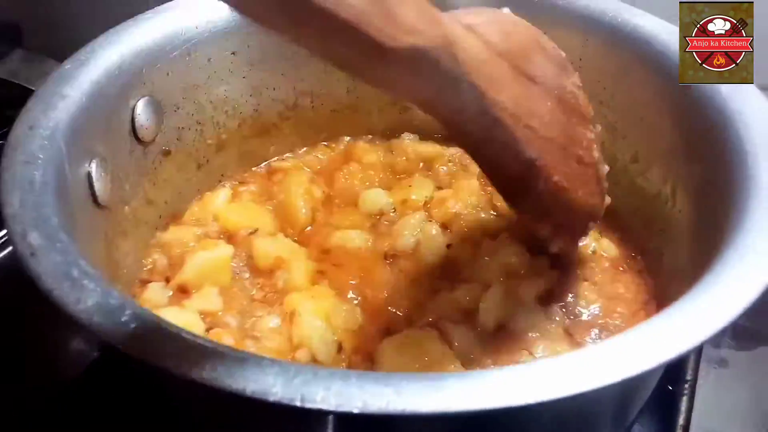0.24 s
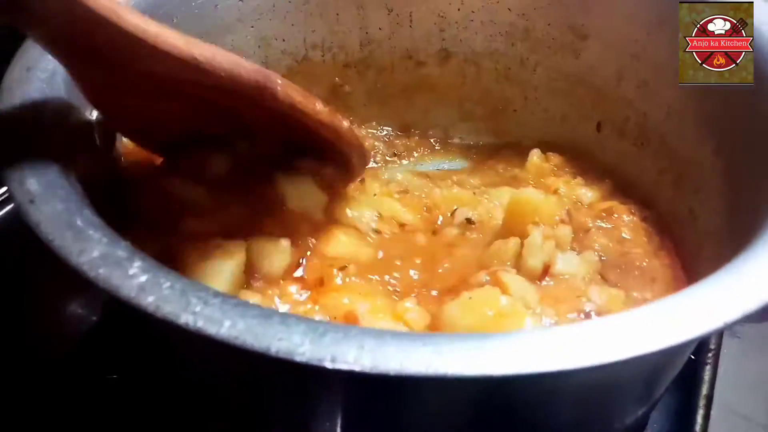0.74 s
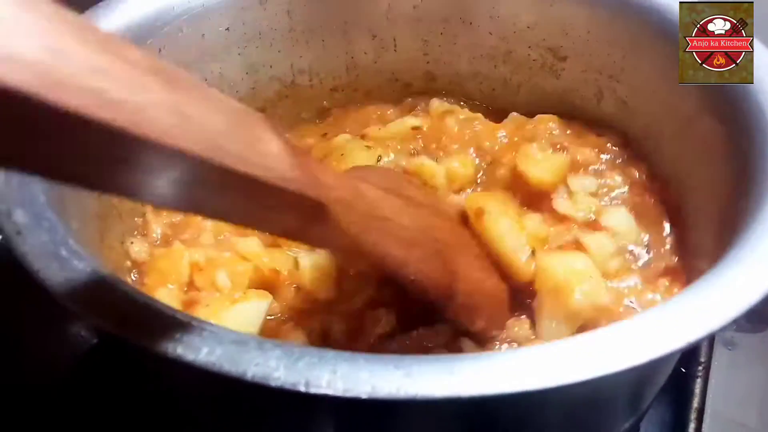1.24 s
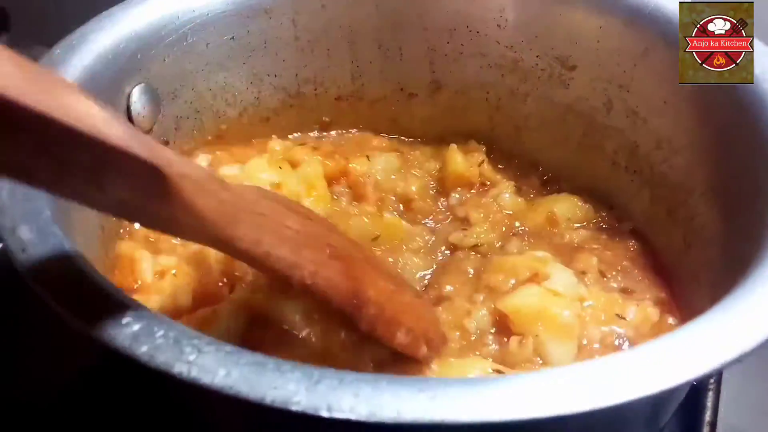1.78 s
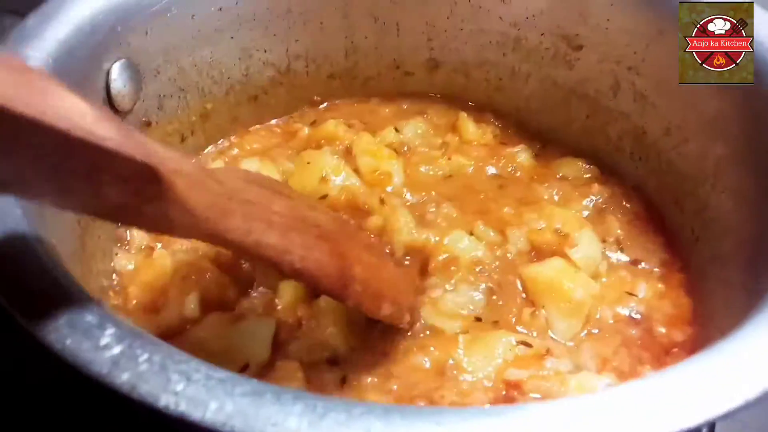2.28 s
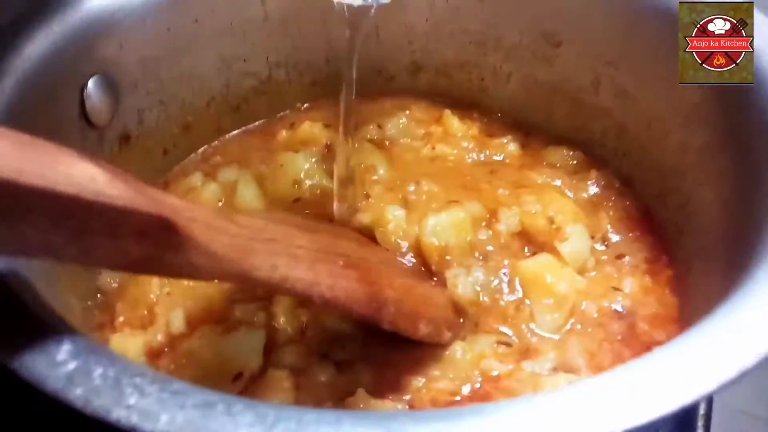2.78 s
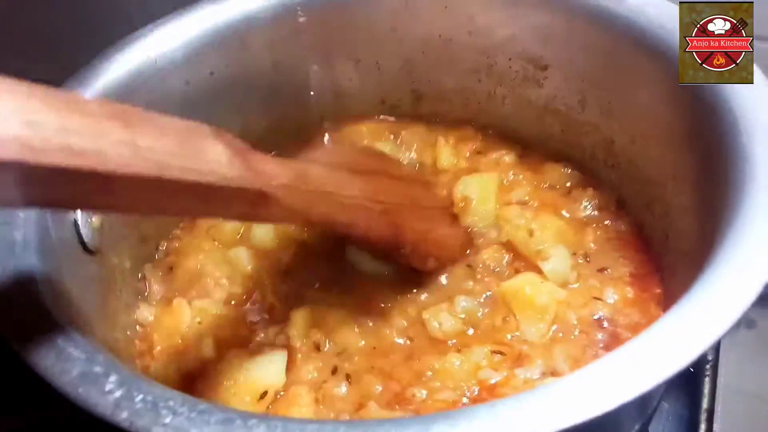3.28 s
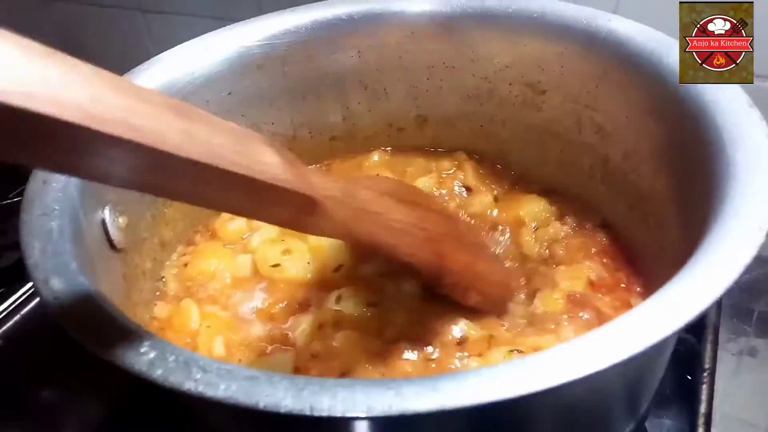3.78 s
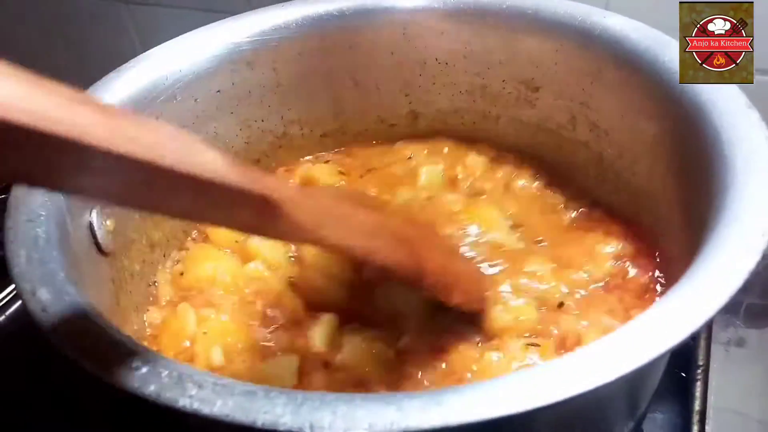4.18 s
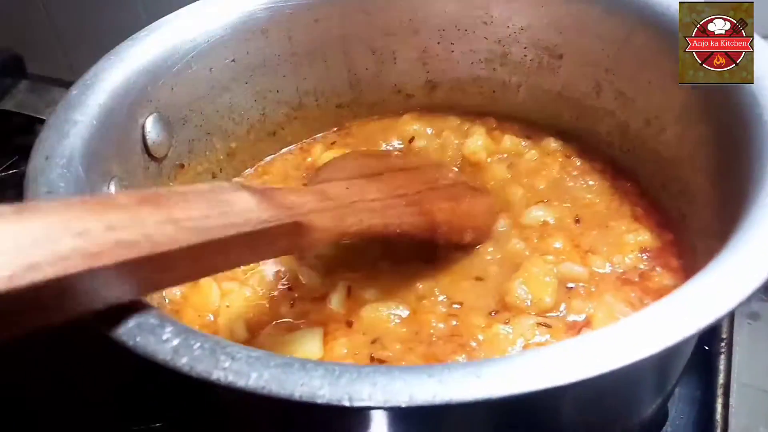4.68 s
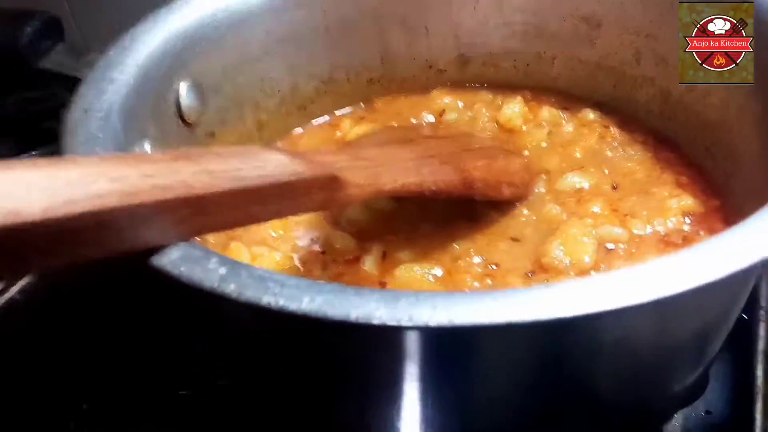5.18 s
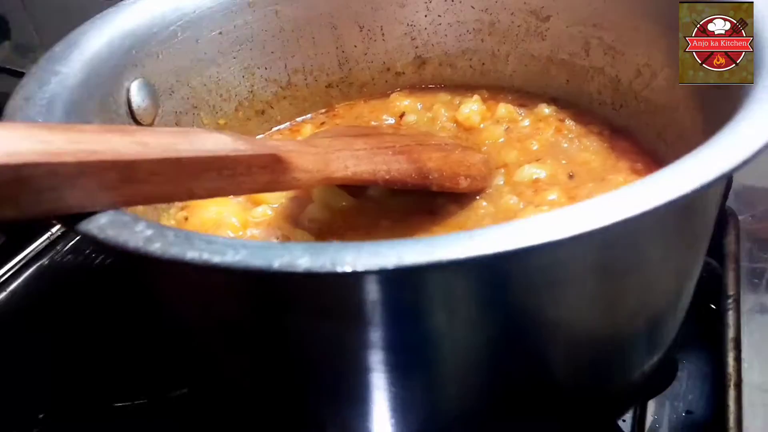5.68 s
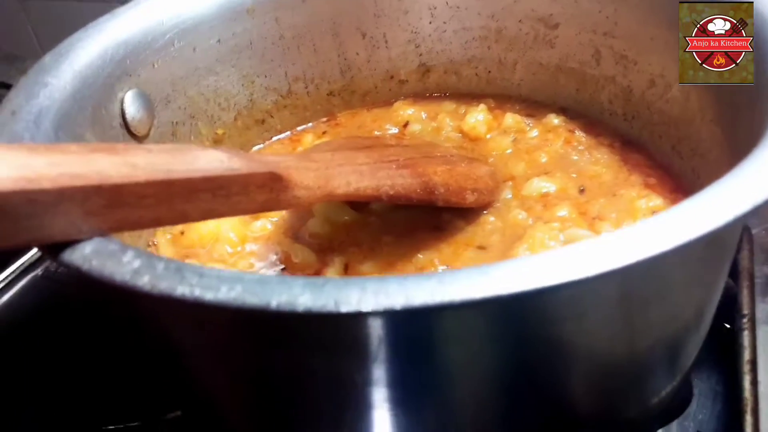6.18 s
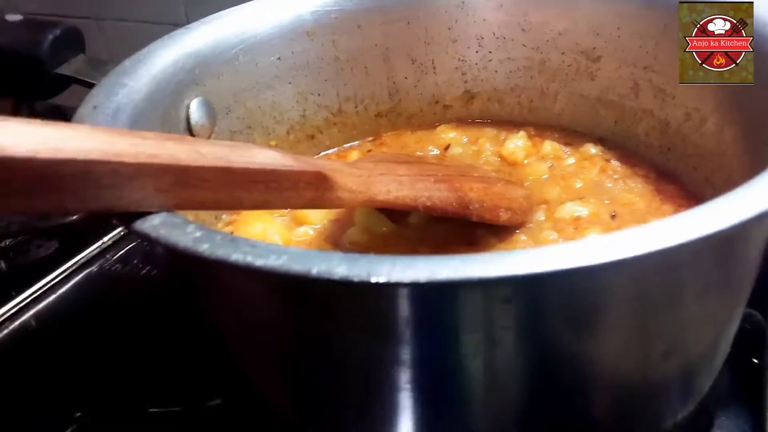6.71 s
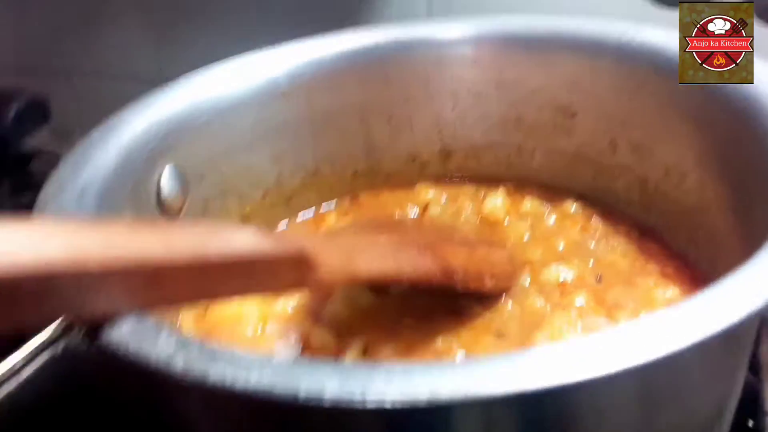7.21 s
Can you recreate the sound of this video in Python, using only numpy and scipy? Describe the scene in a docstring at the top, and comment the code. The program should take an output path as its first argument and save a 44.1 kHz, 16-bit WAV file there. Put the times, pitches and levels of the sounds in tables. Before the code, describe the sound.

In a small, hard-walled kitchen, a wooden spatula gives a few short, damped knocks on a metal pot of thick sauce, strongest in the first second. Tiny high spits and a few plops cluster around three seconds. Quiet scuffs follow over faint flame hiss, simmer and low rumble. Late on, a metal dish clunks down, rings briefly and rocks still. Close microphone.

```python
"""A wooden spatula knocks the wall and bottom of a metal pot of thick curry in a small hard kitchen.
Throughout, liquid spits faintly, with louder spits from half a second in: tiny cavities snap and ring high.
From 2.5 s on, scuffs of filtered friction grains come and go; near three seconds bubbles plop lower.
At 6.6 s a metal dish lands and rocks to rest. Shaped noise makes the gas flame's hiss, a thin sizzle, the
simmer and the low rumble all along, over wavering sines; hard walls echo the knocks, dish and liquid."""
import sys
import numpy as np
from scipy import signal
from scipy.fft import rfft, irfft, next_fast_len
from scipy.io import wavfile

SR = 44100
rng = np.random.default_rng(int(sys.argv[2]) if len(sys.argv) > 2 else 0)


def dump(signal):
    """Clip the signal to [-1, 1] and save it as 16-bit WAV at the path in sys.argv[1]."""
    limited = np.clip(np.atleast_2d(signal).T, -1, 1)
    pcm = np.round(limited * 32767).astype(np.int16)
    wavfile.write(sys.argv[1], SR, pcm)


N = 328545

# spatula on pot: t/s, peak level/dB, wood f/Hz, pot ring level/dB, ring tilt/dB per octave,
# crispness level/dB, drag/s, bass cut f/Hz
SPATULA_KNOCKS = [(0.003, -20.5, 2180, -5.5, 1.5, -12.5, 0.0068, 385),
                  (0.476, -7, 2260, -8, 3.5, -15, 0.0015, 386),
                  (0.606, -27.5, 1520, -10.5, 0, -11.5, 0.013, 500),
                  (0.747, -12, 1110, -4.5, -1, -22, 0.0014, 280),
                  (0.943, -38, 490, -6, -6, -24, 0.0054, 298),
                  (0.973, -38, 2800, -32, -10, -30, 0.0043, 900),
                  (1.016, -30.5, 1540, -20, -0.5, -24.5, 0.0031, 1060),
                  (1.74, -27, 1620, -8, 2, -1.5, 0.0041, 453),
                  (1.753, -27, 1460, -11, -2, -29, 0.0018, 440),
                  (2.699, -24, 796, -13, -4.5, -40, 0.0055, 580),
                  (3.365, -32.5, 1880, -17, 5, -11.5, 0.0081, 450),
                  (4.772, -25.5, 1980, -13, -4, -18, 0.0055, 280)]
# pot modes, damped by the sauce: f/Hz, level/dB, t60/s
POT_MODES = [(415, -11.5, 0.1), (580, -14.5, 0.018), (790, -14, 0.023), (930, -16, 0.017),
             (1120, -10, 0.011), (1390, -6.5, 0.012), (1587, -6.5, 0.011), (2040, -4, 0.012),
             (2350, -5.5, 0.013), (2680, -5, .012), (2780, -25, 0.0071), (3470, -21, 0.011),
             (4390, -16, 0.017)]
# loudest spits of liquid: t/s, peak level/dB, f/Hz
LOUD_SPITS = [(0.5385, -45, 9900), (0.656, -41.5, 10100), (1.3073, -25, 15000), (1.9056, -43, 15200),
              (2.0612, -48, 10200), (2.2099, -42.5, 9600), (2.2308, -38, 15300), (2.5057, -35, 14900),
              (2.6938, -36, 15100), (2.791, -29, 15300), (2.8509, -50, 9420), (2.9317, -30.5, 15400),
              (2.9572, -32, 15200), (2.9704, -35, 15400), (2.9897, -38, 10600), (2.9971, -34, 11400),
              (3.0134, -35, 14900), (3.04, -30, 14900), (3.0554, -43, 9400), (3.0754, -42, 15000),
              (3.27, -37, 9570), (3.6197, -38, 15000), (6.502, -47, 9300), (7.0903, -37, 15100),
              (7.1112, -34, 15000)]
# bubbles closing in the sauce: t/s, peak level/dB, f/Hz
BUBBLE_PLOPS = [(2.8526, -38, 2750), (2.9067, -41.5, 3920), (2.931, -38, 4320), (3.144, -41, 4280),
                (3.185, -46, 2670)]
# landing of the dish: t/s, peak level/dB, rim ring level/dB, length/s
DISH_LANDINGS = [(6.602, -31, -37, 0.0024), (6.616, -7.5, -6.5, 0.0094), (6.625, -16, -20, 0.0053),
                 (6.636, -17.5, -25, 0.0055)]
# modes of the dish's body: f/Hz, level/dB, t60/s
DISH_BODY_MODES = [(148, -8, 0.35), (254, -2, 0.06), (423, -11, 0.028), (500, -5, 0.028), (745, -18, 0.048),
                   (824, -0.5, 0.062), (875, 2, 0.026), (1040, 1, 0.025), (1350, -2, .025),
                   (1530, 5.5, 0.015), (1775, 9, 0.0091), (1870, -5, 0.011), (2270, -2, 0.016),
                   (2500, -25, .014), (3130, -30, .015)]
# modes of the dish's rim: f/Hz, level/dB, t60/s
DISH_RIM_MODES = [(3560, -8, .015), (3741, -6, .16), (3808, 6, .06), (4340, -14, .02), (6230, -17, .1),
                  (6380, -12, .12), (10000, -11, .03), (10300, -15, .025)]
# chatter of each rock of the dish: t/s, level/dB, fade/s
DISH_ROCKS = [(6.727, -32.5, .012), (6.765, -42, 0.012), (6.783, -36, .012), (6.823, -41.5, 0.039)]
# slides and scuffs: t/s, level/dB, rise/s, hold/s, fade/s, low f/Hz, high f/Hz
SCUFF_EVENTS = [(2.499, -54.5, 0.0039, 0.013, .015, 2980, 14000), (3.748, -66, 0.045, 0.1, .05, 3000, 5600),
                (4.189, -52.5, 0.006, 0.046, 0.058, 2540, 11100),
                (4.515, -60, 0.086, 0.19, 0.07, 2360, 4670), (4.797, -57, 0.047, 0.056, 0.25, 3050, 7950),
                (5.086, -66, 0.044, 0.12, 0.055, 2500, 6000), (5.805, -66, 0.022, 0.093, .04, 5050, 13200),
                (6.196, -52.5, 0.13, 0.061, 0.13, 2280, 8850),
                (6.815, -45.5, 0.0075, 0.0083, 0.03, 900, 4660),
                (7.011, -40.5, 0.0093, 0.0036, 0.036, 374, 4900), (7.222, -56.5, 0.16, .1, .05, 2630, 8040)]
# flame hiss over time: t/s, level/dB
FLAME_LEVEL = [(0.0, -62), (0.5, -61.5), (2.49, -66), (2.84, -61.5), (3.38, -68.5), (4.96, -68),
               (6.23, -68), (6.47, -59.5), (6.83, -67.5), (7.45, -61.5)]
# relative spectrum of the flame hiss: f/Hz, level/dB per Hz
FLAME_SPECTRUM = [(3000, 3), (4500, -14), (5600, -2.5), (6400, -6), (7400, -38), (8800, -3.5), (10050, 2),
                  (11500, -7.5), (13000, -8.5)]
# narrow tone in the flame hiss: f/Hz, width/Hz, boost/dB
FLAME_WHISTLE = [(10050, 180, 5.5)]
# relative spectrum of the simmer: f/Hz, level/dB per Hz
SIMMER_SPECTRUM = [(290, -28), (500, 9), (544, -14.5), (938, -18), (1110, -14.5), (1520, -12), (2160, -11),
                   (4300, -19), (9000, -29), (11700, -56), (19800, -120)]
# relative spectrum of the thin sizzle: f/Hz, level/dB per Hz
SIZZLE_SPECTRUM = [(10500, -31), (12000, -29), (13600, -39), (14500, -11), (15200, 4), (15600, 1),
                   (16000, -1)]
# relative spectrum of the rumble: f/Hz, level/dB per Hz
RUMBLE_SPECTRUM = [(20, -45), (38, -25.5), (50, -14.5), (80, -15.5), (140, -5.5), (215, -19), (300, -20),
                   (480, -20), (680, -27.5), (950, -29), (1500, -33.5), (2600, -31.5), (3400, -39),
                   (5000, -48), (7500, -60), (16000, -76)]
# room and pot tones in the rumble: f/Hz, width/Hz, boost/dB
RUMBLE_PEAKS = [(101, 14.2, 8), (184.6, 37, 8), (252, 4, 12), (308, 9.4, 8.5), (392.6, 65, 7.5),
                (478, 27, 3), (578, 16, 8), (685, 17, 9), (803, 47, -4), (2554, 550, 9)]
# wavering low tones: f/Hz, rms level/dB
HUM_TONES = [(102, -62.5), (178, -55), (253, -66.5), (395, -64)]
# decay of the kitchen's echoes: f/Hz, t60/s
KITCHEN_DECAY = [(150, 0.1), (530, 0.3), (1400, 0.21), (3700, .17), (10000, 0.23)]
# broad tone colour, dips and peaks: f/Hz, width/Hz, gain/dB
TONE_COLOUR = [(6340, 950, -1), (12900, 1600, -8.5), (9900, 3300, 5.5), (15700, 1200, 5)]

BLADE_CYCLES = 2.6      # wood cycles until the blade is down 60 dB
EDGE_DB, EDGE_DB_PER_OCTAVE = -4.5, -21     # edge tick of a 1 ms touch; change as the drag doubles
SPITS_PER_S, SPIT_FLOOR_DB, SPIT_SPREAD_DB = 8, -59, 3.5    # small spits
SPIT_LOW_HZ, SPIT_HIGH_HZ = 13800, 15500
RIM_TOUCH_S, ROCK_RISE_S, DISH_BODY_TOP_HZ = 0.00047, 0.0031, 3060
SIMMER_DB, SIZZLE_DB, RUMBLE_DB = -63, -75, -51
CUTOFF_HZ = 16800


def spatula():
    """The wood gives a few dead cycles, the pot rings on, the edge adds a bright tick."""
    out = np.zeros(N)
    for s, db, wood_hz, pot_db, tilt_db, crisp_db, drag_s, bass_cut_hz in SPATULA_KNOCKS:
        touch = contact(drag_s, chatter=0.71)
        # the blade bends before it rings: the swing builds over a cycle or two
        bend = ring(touch, wood_hz, BLADE_CYCLES / wood_hz)
        blade = ring(bend, 1.7 * wood_hz, 1.9 / wood_hz) * wood_hz / SR
        pot = from_db(pot_db) * modes(touch, POT_MODES, spread_db=1.0, tilt_db=tilt_db)
        body = butter(4.1 * blade + pot, 4, 3300, "low")      # wet wood is a soft striker
        crisp = from_db(crisp_db) * ring(touch, 4120, 0.0019)
        body = butter(body + crisp, 3, bass_cut_hz, "high")
        edge_db = EDGE_DB + EDGE_DB_PER_OCTAVE * np.log2(1000 * drag_s)
        edge = from_db(edge_db) * butter(touch, 4, [7800, 12000], "band")
        add(out, s, peak_at(db, body + edge))
    return out


def liquid(events, cycles, rise, snap_share):
    """A closing cavity rings a few cycles, rising in pitch, with a sharp snap at its start."""
    out, t = np.zeros(N), np.arange(SR // 20) / SR
    for s, db, hz in events:
        turns = hz * t
        tone = np.sin(2 * np.pi * turns * (1 + rise * turns / cycles))
        swell = 1 - np.exp(-turns / (0.17 * cycles))
        tone = tone * np.exp(-turns / cycles) * swell
        burst = rng.standard_normal(len(t)) * np.exp(-t / 0.0013)
        snap = np.diff(burst, 2, prepend=[0, 0])      # differencing twice leaves mostly treble
        add(out, s, peak_at(db, tone + snap_share * snap))
    return out


def small_spits():
    """Faint cavities close at chance times, mostly near the floor level and a few louder."""
    when, size, pitch = rng.random((round(SPITS_PER_S * N / SR), 3)).T
    level_db = SPIT_FLOOR_DB - SPIT_SPREAD_DB * np.log(1 - 0.95 * size)
    hz = SPIT_LOW_HZ * (SPIT_HIGH_HZ / SPIT_LOW_HZ) ** pitch
    return zip(when * N / SR, level_db, hz)


def dish():
    """The base lands on the counter, rings the rim, then chatters as it rocks."""
    out, t = np.zeros(N), np.arange(N) / SR
    for s, db, rim_db, length_s in DISH_LANDINGS:
        blow = signal.lfilter([0.3], [1, -0.7], contact(length_s, chatter=1.0))      # softened
        body = butter(modes(blow, DISH_BODY_MODES, spread_db=2.5), 4, DISH_BODY_TOP_HZ, "low")
        rim = modes(contact(RIM_TOUCH_S, chatter=0.83), DISH_RIM_MODES, spread_db=5.0)
        add(out, s, peak_at(db, body + from_db(rim_db) * rim))
    rocking = np.zeros(N)
    for s, db, fade_s in DISH_ROCKS:
        rise = np.clip((t - s) / ROCK_RISE_S, 0, 1)
        rocking += from_db(db) * rise * np.exp(-np.maximum(t - s - ROCK_RISE_S, 0) / fade_s)
    taps = rng.standard_normal(N) * (rng.random(N) < 900 / SR)      # about 900 taps a second
    hollow = sum(ring(taps, hz, 0.024) for hz in (750, 840, 840, 960))
    hollow = hollow + 1.8 * ring(taps, 1300, 0.0016)
    return out + butter(rms_one(hollow) * rocking, 4, DISH_BODY_TOP_HZ, "low")


def scuffs():
    """Dense friction grains in a broad band swell, hold and fade."""
    out, t = np.zeros(N), np.arange(SR) / SR
    for s, db, rise_s, hold_s, fade_s, low_hz, high_hz in SCUFF_EVENTS:
        grains = rng.standard_normal(SR) * from_db(2.3 * rng.standard_normal(SR))
        rub = butter(signal.lfilter([1], [1, -0.7], grains), 3, [low_hz, high_hz], "band")
        rub = rms_one(rub + 0.3 * np.diff(grains, prepend=0))      # a share of bright grit
        # the rubbed surface sings a little
        rub = rms_one(rub + 0.044 * ring(grains, 1.15 * low_hz, 0.0017))
        swell = np.sin(np.pi / 2 * np.clip(t / rise_s, 0, 1)) ** 2
        fade = np.exp(-np.maximum(t - rise_s - hold_s, 0) / fade_s)
        add(out, s, from_db(db) * rub * swell * fade)
    return out


def flame():
    """The gas flame hisses as shaped noise with a narrow whistle, flickering in level."""
    s, hiss_db = np.transpose(FLAME_LEVEL)
    level_db = np.interp(np.arange(N) / SR, s, hiss_db) + 1.5 * drift(32)
    return from_db(level_db) * coloured(FLAME_SPECTRUM, FLAME_WHISTLE)


def simmer():
    """The simmer is faint broad noise, wavering in level."""
    edges, white = np.geomspace(500, 9000, 21), rng.standard_normal((2, N))
    shared, out = drift(1.5), np.zeros(N)
    for k, (low, high) in enumerate(zip(edges, edges[1:])):
        band = butter(white[k % 2], 2, [low, high], "band")      # neighbours use separate noises
        waver_db = 1.5 * shared + 1.5 * drift(3.0) + 3.5 * drift(14)
        out += band * from_db(at_hz(SIMMER_SPECTRUM, np.sqrt(low * high)) + waver_db)
    return from_db(SIMMER_DB) * rms_one(out)


def sizzle():
    """A thin noise at the very top flickers in level."""
    return from_db(SIZZLE_DB + 3.4 * drift(25)) * coloured(SIZZLE_SPECTRUM)


def rumble():
    """Steady low noise is raised at the tones of the room and pot."""
    return from_db(RUMBLE_DB) * coloured(RUMBLE_SPECTRUM, RUMBLE_PEAKS)


def hum():
    """Low tones waver a little in pitch and level."""
    out = np.zeros(N)
    for hz, db in HUM_TONES:
        level = from_db(db + 1.54 * drift(3.85)) * np.sqrt(2)
        turns = np.cumsum(hz + 3.008 * drift(4.07)) / SR
        out += level * np.sin(2 * np.pi * turns)
    return out


def kitchen(x):
    """Dense echoes off hard walls: each half octave of noise dies at its own rate."""
    t, echoes = np.arange(SR // 2) / SR, 0
    for low in 100 * 2.0 ** np.arange(0, 7.5, 0.5):
        band = butter(rng.standard_normal(len(t)), 2, [low, low * 2 ** 0.5], "band")
        echoes = echoes + band * from_db(-60 * t / at_hz(KITCHEN_DECAY, low * 2 ** 0.25))
    echoes = echoes * np.clip(t / 0.0024, 0, 1)      # the echoes build over 2.4 ms
    return signal.fftconvolve(x, echoes / np.sqrt(np.sum(echoes ** 2)))[:N]


def contact(length_s, chatter):
    """One touch: a first click, then uneven smaller ones that die over its length."""
    t = np.arange(SR // 2) / SR
    clicks = chatter * rng.standard_normal(len(t)) * np.exp(-t / max(length_s, 1e-4))
    clicks[0] += 1
    return clicks / np.sqrt(np.sum(clicks ** 2))


def modes(clicks, table, spread_db, tilt_db=0):
    """Every mode is struck with a strength of its own, tilted about 1200 Hz."""
    out = 0
    for hz, db, t60 in table:
        strength_db = db + tilt_db * np.log2(hz / 1200) + spread_db * rng.standard_normal()
        out = out + from_db(strength_db) * ring(clicks, hz, t60)
    return out


def ring(clicks, hz, t60):
    """A unit click sets a decaying sine ringing from height 1."""
    r, w = from_db(-60 / (max(t60, 1e-4) * SR)), 2 * np.pi * hz / SR
    return signal.lfilter([0, np.sin(w)], [1, -2 * r * np.cos(w), r * r], clicks + 1e-18)


def coloured(spectrum, tones=()):
    """Noise of a given spectrum, raised at a few tones; rms 1."""
    size = next_fast_len(N)
    hz = np.maximum(np.arange(size // 2 + 1) * SR / size, 1)
    level_db = at_hz(spectrum, hz)
    for top, width, db in tones:
        level_db = level_db + db / (1 + (2 * (hz - top) / width) ** 2)
    return rms_one(irfft(rfft(rng.standard_normal(size)) * from_db(level_db), size)[:N])


def drift(rate):
    """Slow chance of spread 1, smoothed above rate in Hz."""
    step = 40      # samples between drawn points
    r = np.exp(-2 * np.pi * rate * step / SR)
    draws = rng.standard_normal(N // step + 2002)
    slow = signal.lfilter([1], [1, -2 * r, r * r], draws)[2000:]      # skip the settling
    return np.interp(np.arange(N) / step, np.arange(len(slow)), rms_one(slow))


def butter(x, order, edge_hz, kind):
    """Pass a sound through a Butterworth filter."""
    return signal.sosfilt(signal.butter(order, edge_hz, kind, fs=SR, output="sos"), x)


def at_hz(points, hz):
    """Read a table on a log-frequency axis."""
    table_hz, value = np.transpose(points)
    return np.interp(np.log(hz), np.log(table_hz), value)


def add(out, s, sound):
    """Mix a short sound in at s seconds."""
    at = round(s * SR)
    out[at:at + len(sound)] += sound[:N - at]


def peak_at(db, x):
    """Scale a short sound to a peak level."""
    return from_db(db) * x / np.max(np.abs(x))


def rms_one(x):
    """Scale to rms 1."""
    return x / np.sqrt(np.mean(x ** 2) + 1e-20)


def from_db(db):
    """Decibels to gain."""
    return 10 ** (np.asarray(db) / 20)


def scene():
    """Mix the struck and wet sounds, their echoes, and the beds below."""
    # small hard things send out little bass
    blows = butter(spatula() + dish(), 2, 130, "high")
    wet = liquid([*LOUD_SPITS, *small_spits()], cycles=20.6, rise=0.012, snap_share=0.41)
    wet = wet + liquid(BUBBLE_PLOPS, cycles=5.9, rise=0.017, snap_share=0.065)
    echoes = kitchen(from_db(-2.0) * blows + from_db(-9) * wet)
    beds = flame() + simmer() + sizzle() + rumble() + hum()
    return (blows + wet + echoes + scuffs() + beds)[None]


def record(dry):
    """Broad dips and peaks shape the treble; the top steps down 20 dB by 15.8 kHz and is then cut."""
    for hz, width, db in TONE_COLOUR:
        r, w = np.exp(-np.pi * width / SR), 2 * np.pi * hz / SR
        gain = (1 - r * r) / 2      # about unity at the band's centre
        band = signal.lfilter(gain * np.array([1, 0, -1]), [1, -2 * r * np.cos(w), r * r], dry)
        dry = dry + (from_db(db) - 1) * band
    stepped = signal.sosfilt(signal.cheby2(10, 20, 15800, fs=SR, output="sos"), dry)
    return signal.sosfilt(signal.cheby2(14, 70, CUTOFF_HZ, fs=SR, output="sos"), stepped)


dry = scene()
out = record(dry)
dump(out)
```